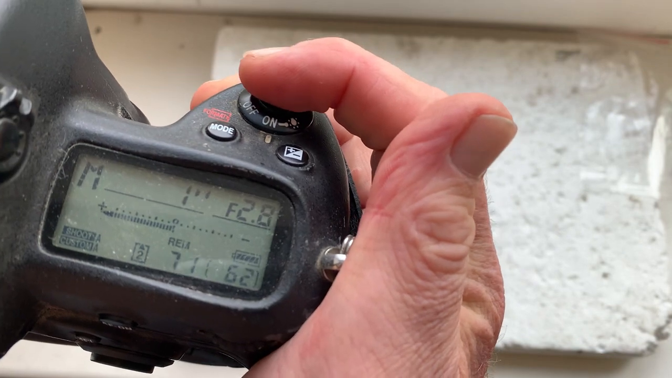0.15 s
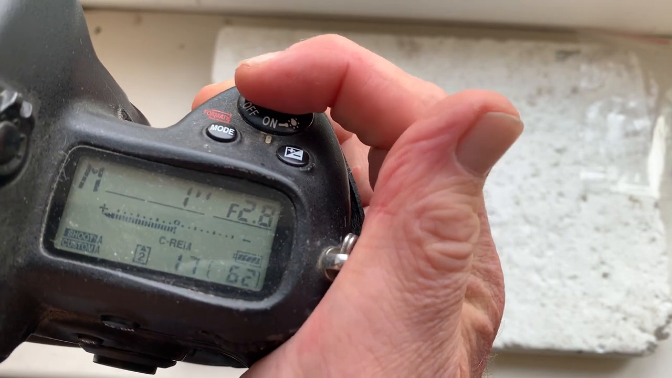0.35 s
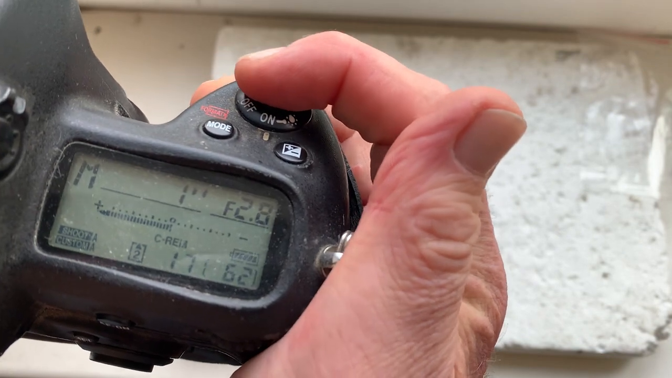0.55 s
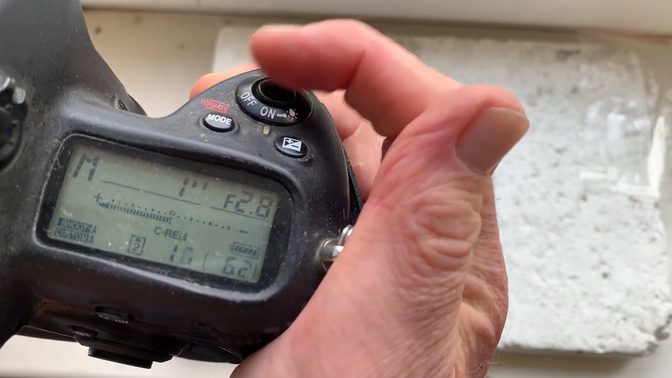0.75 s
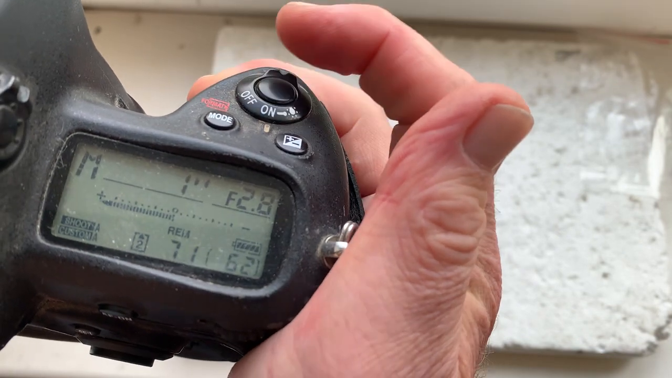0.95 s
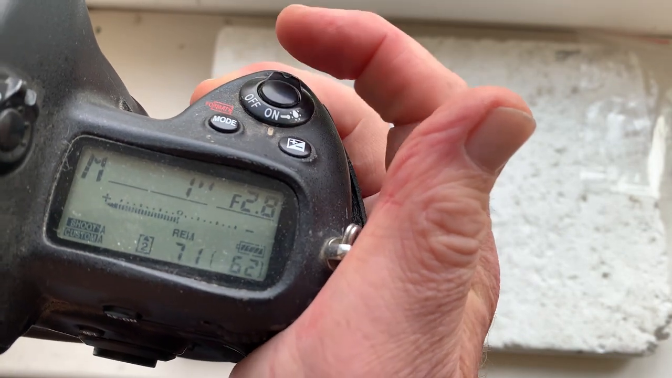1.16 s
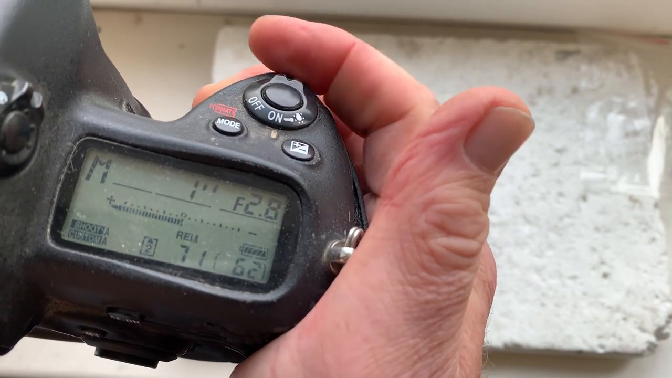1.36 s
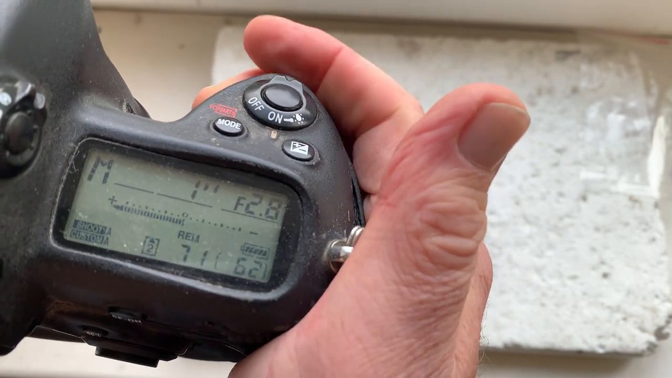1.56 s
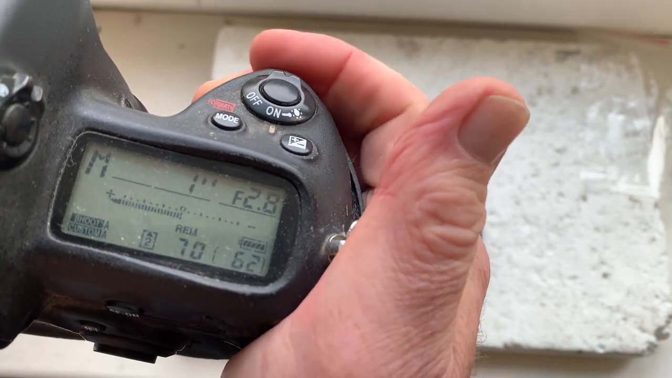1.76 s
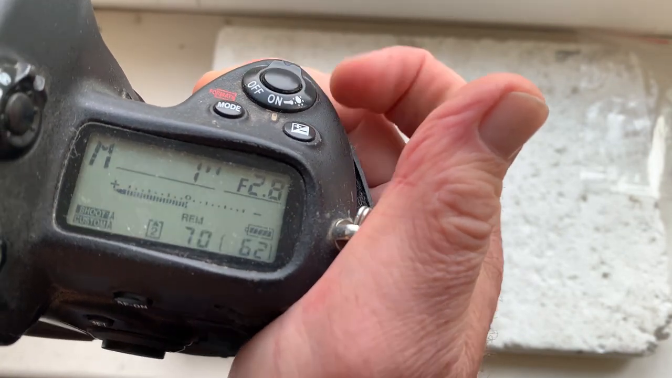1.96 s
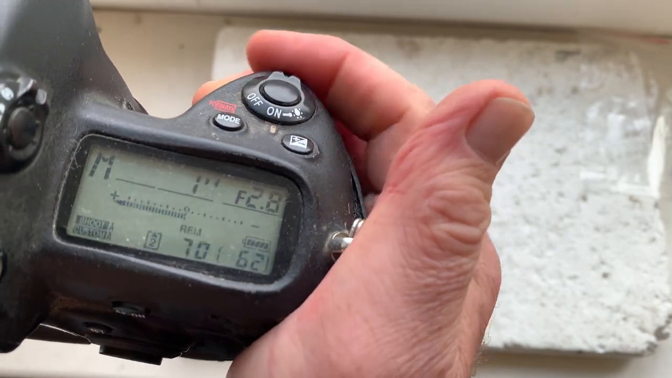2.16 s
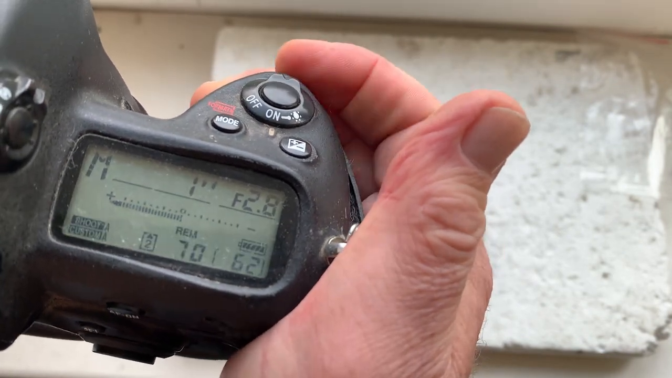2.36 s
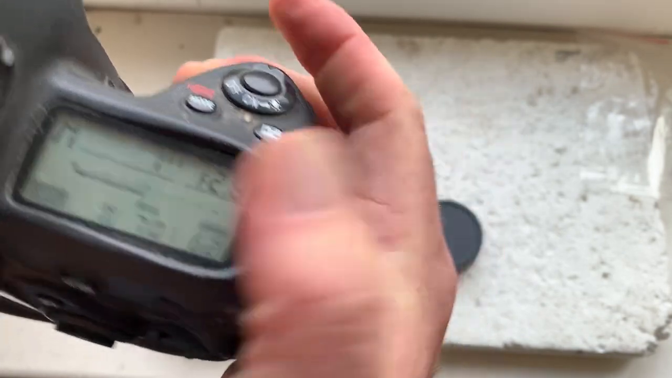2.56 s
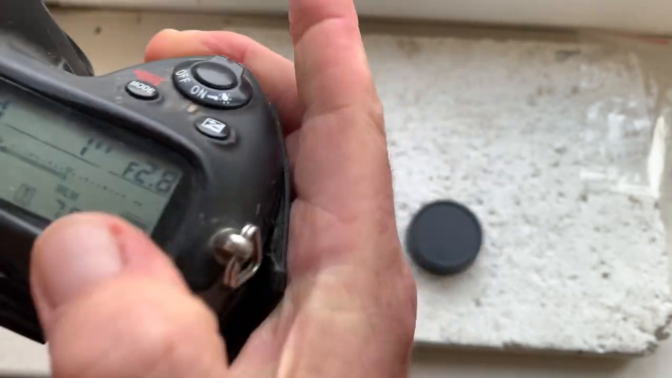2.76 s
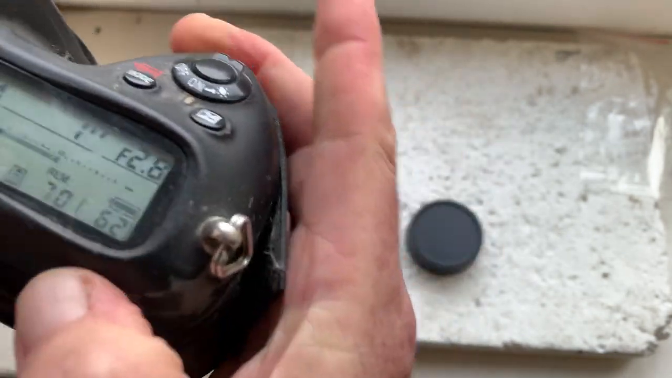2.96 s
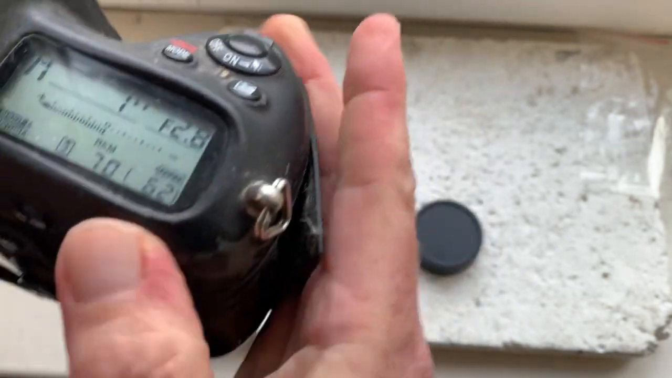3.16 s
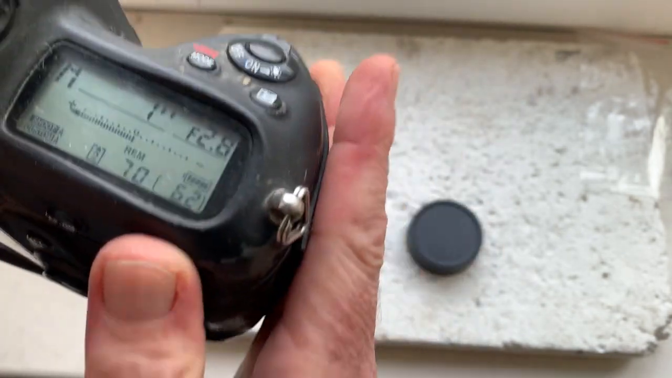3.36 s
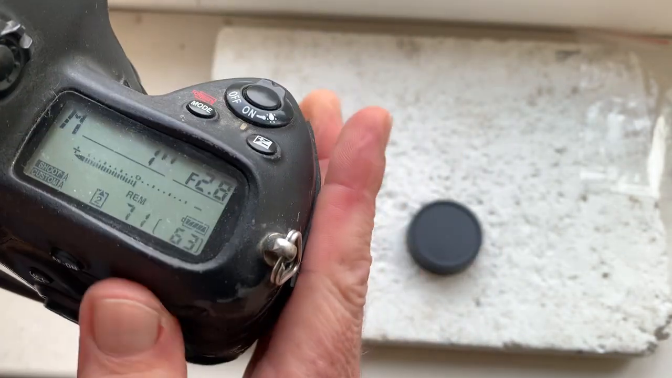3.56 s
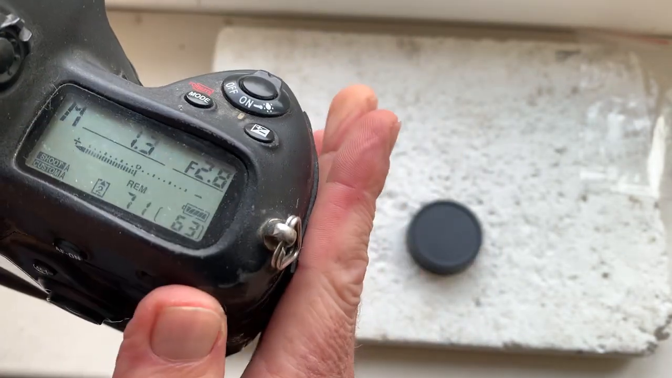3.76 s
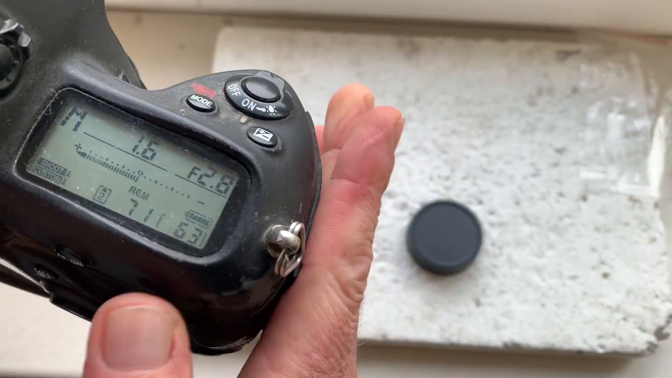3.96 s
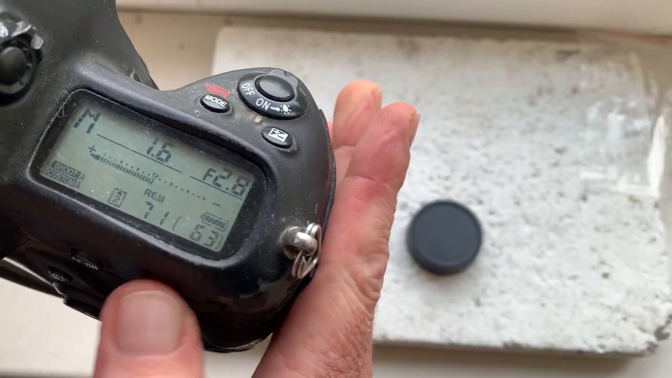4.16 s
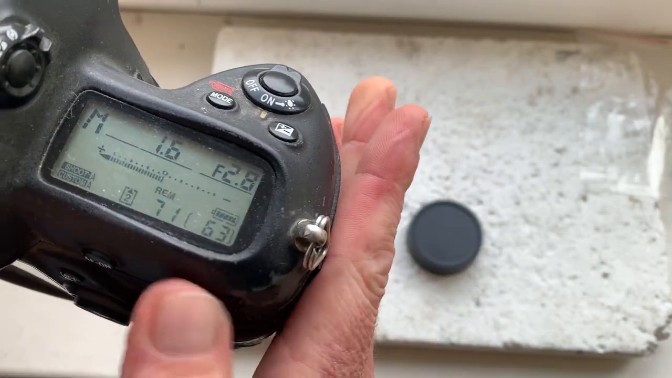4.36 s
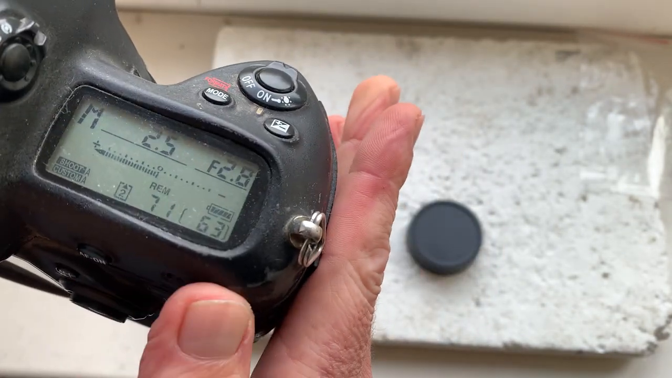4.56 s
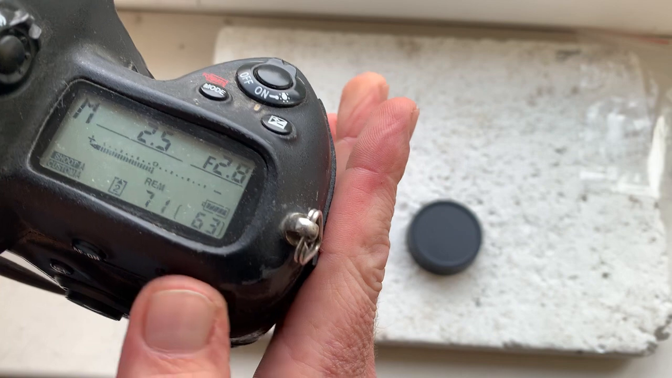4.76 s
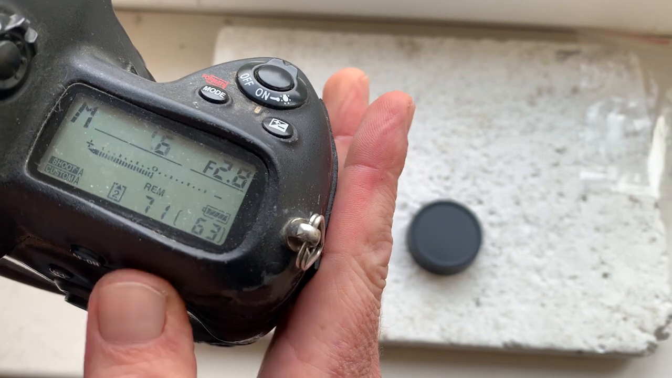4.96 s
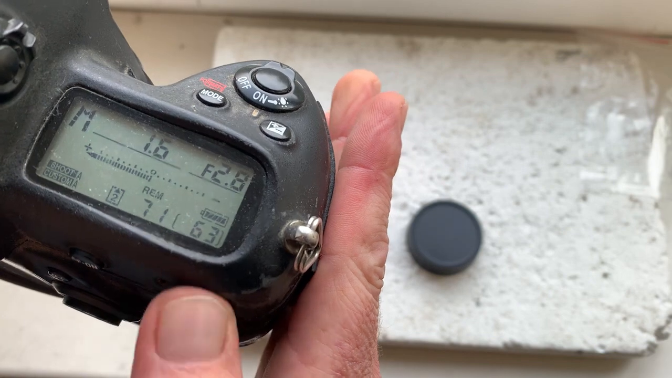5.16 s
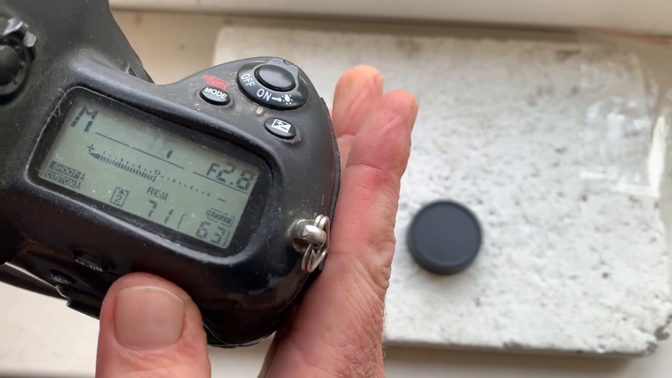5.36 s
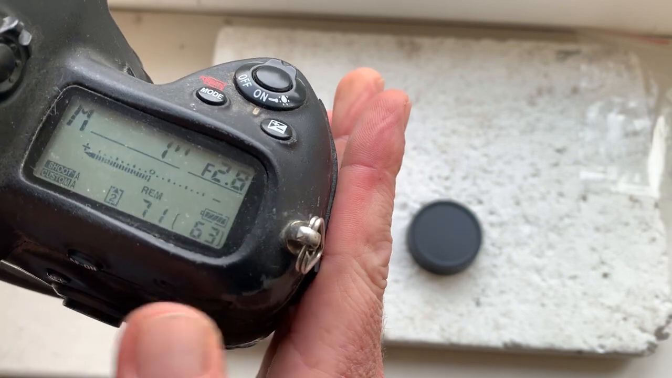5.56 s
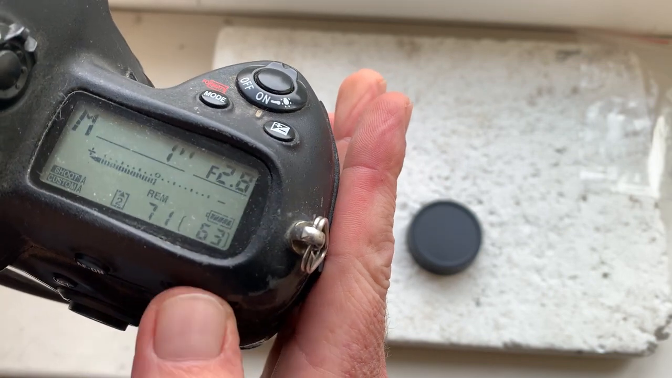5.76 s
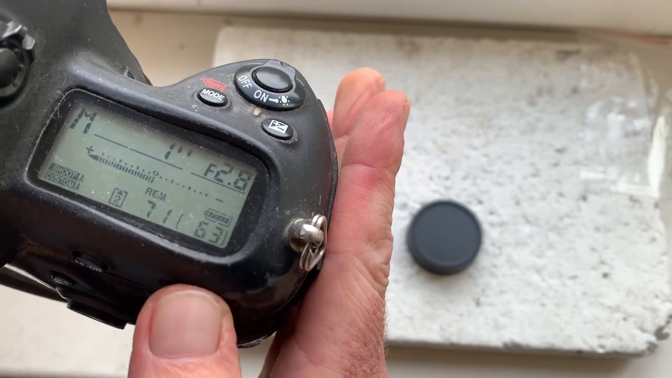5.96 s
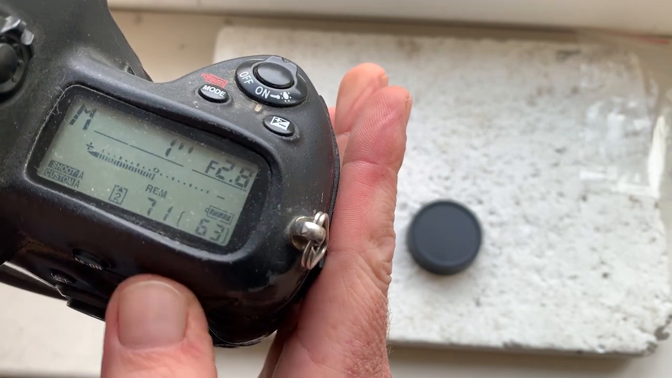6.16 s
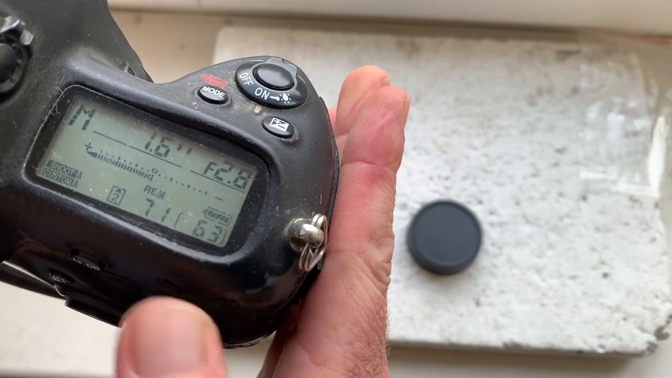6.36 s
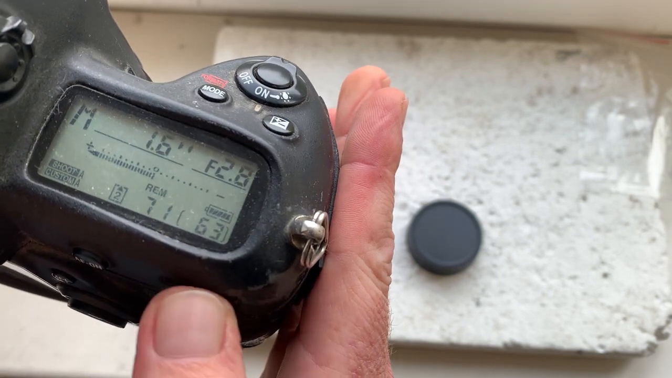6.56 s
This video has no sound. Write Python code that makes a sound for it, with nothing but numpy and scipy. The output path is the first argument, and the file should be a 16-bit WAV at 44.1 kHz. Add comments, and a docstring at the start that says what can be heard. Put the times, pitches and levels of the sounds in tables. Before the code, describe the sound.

A camera shutter snaps open sharply, closes with a clattering clack a second later, then handling ticks, a skin rub and faint dial clicks follow.

```python
"""A low hum and faint hiss fill a small quiet room. A reflex camera close by is touched, then takes a one-second
exposure: the mirror slaps up and bounces and the first curtain runs open; later the second curtain drops and the
mechanism recocks in a short clatter. The finger leaves the release, the hand shifts its grip and slides, and the
thumb turns a dial. Contacts are bursts of tiny impacts coloured by their part, slides are grainy noise, and the
hum is made of wavering sines. Loud bass makes a compressor turn the bass down for a moment."""
import sys
import numpy as np
from scipy import signal
from scipy.fft import rfft, irfft, next_fast_len
from scipy.io import wavfile
from scipy.ndimage import uniform_filter1d, minimum_filter1d, map_coordinates

SR = 44100
rng = np.random.default_rng(int(sys.argv[2]) if len(sys.argv) > 2 else 0)


def generate_wav(signal):
    """Clip the signal to [-1, 1] and save it as 16-bit WAV at the path in sys.argv[1]."""
    frames = np.transpose(np.atleast_2d(signal))
    scaled = np.clip(frames, -1, 1) * 32767
    pcm = np.round(scaled).astype(np.int16)
    wavfile.write(sys.argv[1], SR, pcm)


N = 290971  # length in samples
TOP_HZ = 16200  # nothing much is kept above this
# how alike left and right are in the background and the room tail: f/Hz, likeness (1 = the same)
DISTANT_ALIKE = [(130, .87), (300, .94), (640, .05), (5000, 0.017), (8500, 1), (15000, .4)]
# colour of the first curtain's blades, used in the table of part colours: f/Hz, relative level/dB
BLADES = [(150, -48), (900, -20), (1450, -3), (1800, -15), (2300, -17), (3400, -8), (5000, -3), (6800, -8),
          (8600, 0), (10700, 0), (11700, -6), (12900, -5), (14200, -15), (15600, -14)]


def amp(db):
    """Turn decibels into a plain factor."""
    return 10 ** (np.asarray(db) / 20)


def unit(x):
    """Scale to an average (RMS) strength of 1."""
    return x / np.sqrt(np.mean(x ** 2) + 1e-20)


def along(points, hz):
    """Read a curve of (f/Hz, value) points on a log frequency axis."""
    f, v = np.transpose(points)
    return np.interp(np.log(hz + 1), np.log(f + 1), v)


def waver(rate):
    """A random curve that takes a new value rate times a second, with smooth paths between."""
    return map_coordinates(rng.standard_normal(4096), [np.arange(N) / SR * rate], mode="wrap")


def add(track, s, sound):
    """Mix a sound in at time s."""
    start = round(s * SR)
    track[:, start:start + sound.shape[1]] += sound[:, :N - start]


def band_limit(hz, order=90):
    """Gain of a steep low-pass."""
    return 1 / np.sqrt(1 + (hz / TOP_HZ) ** (2 * order))


def filtered(x, response):
    """Multiply the spectrum of x by a response that depends on frequency."""
    size = next_fast_len(x.shape[-1] + SR // 8)
    spectrum = rfft(x, size) * response(np.fft.rfftfreq(size, 1 / SR))
    return irfft(spectrum, size)[..., :x.shape[-1]]


def coloured(x, spectrum, tilt_db=0, size=8192):
    """Colour x without sounding early; unit power gain, tilted by tilt_db per octave above 1 kHz."""
    hz = np.fft.rfftfreq(size, 1 / SR)
    octaves = np.log2(np.maximum(hz / 1000, 1))
    gain = unit(amp(along(spectrum, hz) + tilt_db * octaves) * band_limit(hz))
    # folding the cepstrum forward gives a filter that starts at once (minimum phase)
    cepstrum = irfft(np.log(gain + 1e-4))
    cepstrum[1:size // 2] *= 2
    cepstrum[size // 2 + 1:] = 0
    impulse = irfft(np.exp(rfft(cepstrum)))[None, :size // 2]
    return signal.fftconvolve(x, impulse, axes=1)[:, :x.shape[1]]


def spread(pair, alike):
    """Turn two unrelated signals, used as mid and side, into left and right with the given likeness."""
    def shares(hz):
        turn = np.arccos(np.clip(along(alike, hz), -1, 1)) / 2
        return np.array([np.cos(turn), np.sin(turn)])

    mid, side = filtered(pair, shares)
    return np.array([mid + side, mid - side])


def contact(t, t60, rise):
    """One blow: a dense rattle of tiny impacts that dies quickly."""
    impacts = rng.choice([-1, 1], (2, len(t)))
    return impacts * amp(-60 * t / t60) * (1 - np.exp(-t / rise))


def friction(size, grain_db):
    """Skin catches and slips: noise broken into millisecond grains of uneven strength."""
    grains = amp(grain_db * unit(uniform_filter1d(rng.standard_normal(size), size=80)))
    return unit(grains * rng.standard_normal((2, size)))


def background():
    """The building's low, slightly wavering hum and rumble, and a faint even hiss of air."""
    # steady tones: f/Hz, level/dB against the rumble setting
    hum_tones = [(43.1, -10), (75.2, -4)]
    # colour of the rumble: f/Hz, relative level/dB
    rumble_colour = [(20, -16.5), (32, -8), (45, -2.5), (58, -7.5), (78, -2), (95, -3.5), (120, -6.5),
                     (165, -10.5), (220, -22), (400, -35), (900, -85)]
    # colour of the air hiss: f/Hz, relative level/dB
    air_colour = [(150, -18), (280, -10.5), (390, 3), (600, -9), (1000, -12.5), (2000, -14.5), (4000, -19),
                  (8000, -22), (11300, -17), (13200, -24.5), (15000, -34)]
    rumble_db, drift_db, drift_per_s = -61.5, -0.5, 3.2  # base level, size and pace of its drift

    def noise(spectrum):
        raw = rng.standard_normal((2, N))
        return unit(spread(filtered(raw, lambda hz: amp(along(spectrum, hz))), DISTANT_ALIKE))

    t = np.arange(N) / SR
    hum = 0
    for hz, db in hum_tones:
        phase = 2 * np.pi * hz * t + 0.91 * waver(5)
        hum = hum + amp(db) * np.sqrt(2) * np.sin(phase)
    level = amp(rumble_db + drift_db * waver(drift_per_s))
    return level * (hum + amp(-4.5) * noise(rumble_colour)) + amp(-77.5) * noise(air_colour)


def ticks(rows, spectrum, gain_db, neutral_db, softening, t60, settle_db, ring_db, ring_t60):
    """Small clicks with a brief ring and a faint settling rattle; more midrange means a duller click."""
    out, t = np.zeros((2, N)), np.arange(SR // 6) / SR
    for s, db, midrange_db, hz in rows:
        tick = contact(t, t60, rise=0.00049) + amp(settle_db) * contact(t, 0.058, rise=.001)
        tick = coloured(tick, spectrum, tilt_db=softening * (neutral_db - midrange_db))
        ring = amp(ring_db) * np.sin(2 * np.pi * (hz * t + rng.random((2, 1))))
        add(out, s, amp(db + gain_db) * (tick + amp(-60 * t / ring_t60) * ring))
    return out


def grip_ticks():
    """Fingers tap the release button and the grip: quick coloured blows with a short ring."""
    # touches: t/s, relative level/dB, midrange against treble/dB, ring f/Hz
    touches = [(.2364, -57.5, -15, 2880), (.7761, -36, -15.5, 10100), (1.8168, -37.5, -46, 10330),
               (1.8325, -48.5, -8, 10600), (1.875, -42.5, -5.5, 10500), (1.8831, -41.5, -11.5, 9540),
               (2.4319, -30, -15, 8030), (2.4822, -32, -10.5, 3420), (2.4869, -32, -8.5, 7060),
               (2.5369, -29.5, -12, 7350), (2.5612, -28, -14.5, 11100), (2.5701, -27.5, -12.5, 10600),
               (2.612, -43.5, -3.5, 5140), (2.679, -53.5, -8, 4400), (2.7053, -45, -14, 6320),
               (3.1707, -26.5, -18.5, 11000), (6.5525, -50, -8.5, 4580)]
    # colour of a touch: f/Hz, relative level/dB
    colour = [(200, -41), (900, -26.5), (2000, -14), (3800, -7), (6000, -7.5), (8500, 1.5), (11000, -5.5),
              (13000, -11.5), (15000, -38)]
    return ticks(touches, colour, gain_db=-3, neutral_db=-16.5, softening=0.67, t60=0.0082,
                 settle_db=-15.0, ring_db=-7.5, ring_t60=0.015)


def dial_clicks():
    """The dial clicks sharply: blows that last longer than a touch and ring more strongly."""
    # clicks: t/s, relative level/dB, midrange against treble/dB, ring f/Hz
    clicks = [(.3324, -65, -4, 2895), (2.1145, -58.5, -11, 4120), (2.2884, -53, 10, 3800),
              (3.4024, -47, -4, 1911), (3.612, -55, -10.5, 2010), (3.6559, -45.5, 10, 2030),
              (3.6814, -47, -13, 2200), (3.9205, -45, -9, 2430), (4.6728, -49.5, -13.5, 2940),
              (4.8698, -44, -13, 1960), (5.4748, -47.5, -6.5, 2740)]
    # colour of a click: f/Hz, relative level/dB
    colour = [(250, -34.5), (1000, -11.5), (1800, 3), (2800, 3), (4000, -5), (5300, -13.5), (7200, 1.5),
              (9000, 0.5), (11000, 3), (13000, -20), (15000, -34)]
    return ticks(clicks, colour, gain_db=-5, neutral_db=-14.0, softening=0.52, t60=0.0162,
                 settle_db=-9.5, ring_db=-3, ring_t60=.022)


def mechanism(bounce_count, tooth_count):
    """List every contact inside the camera: blows, their rattles, curtain runs, mirror rebounds, gear teeth."""
    # main blows: t/s, relative level/dB, time to fall by 60 dB/s, part
    blows = [(0.4345, -12, 0.0083, "mirror"), (.4364, -8.5, 0.0098, "mirror"),
             (0.4752, -15, 0.021, "blades"), (1.4746, -12.5, 0.019, "drop"),
             (1.4933, -16.5, 0.022, "recock"), (1.4965, -20, 0.02, "recock"),
             (1.501, -18.5, 0.031, "recock"), (1.5109, -22, 0.014, "recock"), (1.5175, -15, .011, "recock")]
    # loose parts rattle after every blow: delay, level against it, decay
    rattle_s, rattle_db, rattle_t60_s = .0035, -16, .045
    # a curtain runs before its stop: time ahead, level against the stop, decay
    run_s, run_db, run_t60_s = .0048, -13, .045
    bounce_s, bounce_shrink = .012, .68  # the mirror's first flight, each next flight over the last
    bounce_db, bounce_loss_db, bounce_t60_s = -22.5, 6.5, 0.02405  # first rebound, loss per rebound, decay
    # recocking gear: start, time from tooth to tooth, relative level, decay
    gear_start_s, gear_step_s, gear_db, gear_t60_s = 1.482, .0066, -28.5, .04

    rattles = [(s + rattle_s, db + rattle_db, rattle_t60_s, part) for s, db, _, part in blows]
    runs = [(s - run_s, db + run_db, run_t60_s, part)
            for s, db, _, part in blows if part in ("blades", "drop")]
    mirror_up = max(s for s, _, _, part in blows if part == "mirror")
    landings = mirror_up + np.cumsum(bounce_s * bounce_shrink ** np.arange(bounce_count))
    rebounds = [(s, bounce_db - bounce_loss_db * k, bounce_t60_s, "mirror")
                for k, s in enumerate(landings)]
    teeth = [(gear_start_s + gear_step_s * k, gear_db, gear_t60_s, "recock") for k in range(tooth_count)]
    return blows + rattles + runs + rebounds + teeth


def shutter(shove_db, shove_s):
    """Each contact cracks in the colour of its part and shoves the body, which rings."""
    # colour of each part's blow, by part name: f/Hz, relative level/dB
    part_colours = {"mirror": [(100, -51), (330, -33), (520, -20), (1000, -9), (1370, -10), (1800, -20.5),
                    (2250, -6), (2700, -8), (3500, -1.5), (5400, -15), (8800, -6.5), (9800, -11.5),
                    (10700, 3.5), (12300, -9), (15500, -17)], "blades": BLADES, "drop": [(80, -44),
                    (290, -23), (385, -7.5), (560, -17), (800, -11), (1400, 0.5), (2400, -16), (3600, 1.5),
                    (5700, -6.5), (7300, -1), (9000, 0.5), (11500, -12), (12700, -1.5), (14400, -27),
                    (15600, -20)], "recock": [(120, -71), (380, -17), (520, -25), (900, -6.5), (1500, -6.5),
                    (2200, -13), (3700, -6.5), (6500, -8), (8500, 1), (11400, -4), (12600, -1),
                    (14200, -16), (15600, -14.5)]}
    # resonances of the body and its springs: f/Hz, peak gain/dB, time to fall by 60 dB/s
    body_modes = [(374, 5, .1), (651.5, 1, 0.13), (849, 4.5, 0.11), (1430, -1.5, .025), (1827, 1.5, 0.025),
                  (3320, 1.5, 0.033), (3800, -3, .056), (4560, -2, .07), (6281, 0, 0.11),
                  (7060, -2.5, 0.12), (9560, 0, 0.053), (10700, -4, 0.035), (12300, -3.5, .05)]
    cracks, t = np.zeros((2, N)), np.arange(SR // 5) / SR
    shove = (1 - t / shove_s) * np.exp(-t / shove_s)  # one low push, common to both sides
    for s, db, t60, part in mechanism(bounce_count=4, tooth_count=7):
        crack = coloured(contact(t, t60, rise=.00033), part_colours[part])
        crack[0] += amp(shove_db) * shove
        add(cracks, s, amp(db + 1.5) * crack)
    ring = np.zeros(len(t))
    for hz, db, t60 in body_modes:
        fade = amp(-60 * t / t60)
        ring += amp(db) * 2 * fade / fade.sum() * np.cos(2 * np.pi * hz * t)
    return cracks + signal.fftconvolve(cracks, ring[None], axes=1)[:, :N]


def thumb(grain_db):
    """A dial or switch scrapes twice at each notch: climbing out of one detent, dropping into the next."""
    # notches: t/s of the climb, climb level/dB, drop level/dB, tilt/dB per octave
    drags = [(1.852, -77, -57.5, 10), (2.267, -73, -74.5, 1.5), (3.656, -56, -57.5, .5),
             (4.383, -64, -83, 0), (4.443, -71, -94, -1), (4.84, -62.5, -58.5, -1), (5.263, -62.5, -63, -2),
             (6.105, -67, -82, -0.5)]
    # colour of the scrape: f/Hz, relative level/dB
    drag_colour = [(250, -23), (800, -14), (1500, -4), (2200, 0), (3200, -13), (3900, -2), (4700, -14.5),
                   (6000, -14.5), (7200, -12), (10000, -9), (13000, -17.5), (15000, -26)]
    notch_s, drag_half_s = 0.029, 0.0092  # climb to drop, bell-curve width of each
    out, t = np.zeros((2, N)), np.arange(-SR // 10, SR // 10) / SR

    def swell(delay):
        return np.exp(-((t - delay) / drag_half_s) ** 2 / 2)

    for s, climb_db, drop_db, tilt_db in drags:
        strength = amp(climb_db) * swell(0) + amp(drop_db) * swell(notch_s)
        stroke = strength * friction(len(t), grain_db)
        add(out, s + t[0], coloured(stroke, drag_colour, tilt_db))
    return out


def palm(grain_db):
    """The palm hisses along the textured grip in swelling, fading slides; skin squeaks near the strongest."""
    # slides: t/s of the strongest rub, level/dB, swell/dB per s, fade/dB per s
    slides = [(2.44, -64.5, 600, 63), (2.88, -87.5, 59, 60), (3.214, -53.5, 121, 440)]
    # colour of rubbing skin: f/Hz, relative level/dB
    skin_colour = [(500, -31), (1500, -11), (2000, -3.5), (2600, -11.5), (3700, -1.5), (6000, -6),
                   (8500, -1), (10500, -3), (13000, -7.5), (14500, -28)]
    # squeaks: t/s of the middle, bell-curve width/s, f/Hz, waver of f/Hz, level/dB
    squeaks = [(3.103, 0.063, 1997, 110, -75), (3.198, 0.015, 3750, 450, -54.5)]
    t = np.arange(N) / SR
    rub = sum(amp(db - np.maximum(swell * (s - t), fade * (t - s))) for s, db, swell, fade in slides)
    out = rub * coloured(friction(N, grain_db), skin_colour)
    for s, half, hz, waver_hz, db in squeaks:
        pitch = hz + waver_hz * waver(500)
        envelope = amp(db) * np.exp(-((t - s) / half) ** 2 / 2)
        out = out + envelope * np.sin(2 * np.pi * np.cumsum(pitch) / SR)
    return out


def room(x, build):
    """The walls answer with a short diffuse tail whose decay time depends on frequency."""
    # decay of the tail: f/Hz, time to fall by 60 dB/s
    decay = [(200, .083), (1400, 0.22), (5000, .19), (10000, .15), (15000, .14)]
    hz, t, z = signal.stft(rng.standard_normal((2, SR // 2)), SR, nperseg=256)
    envelope = amp(-60 * t / along(decay, hz)[:, None]) * (1 - np.exp(-t / build))
    tail = signal.istft(z * envelope, SR, nperseg=256)[1]
    tail = tail / np.linalg.norm(tail[0])
    return spread(signal.fftconvolve(x, tail, axes=1)[:, :N], DISTANT_ALIKE)


def bass_compressor(x):
    """Loud bass slowly pushes the bass down; the cut holds, then lets go at a steady rate."""
    # upper edge of the bass, level where cutting starts, dB cut per dB above it, deepest cut
    edge_hz, threshold_db, slope, depth_db = 720, -58.5, 1.8, 11
    lag_s, attack_s, hold_s, release_db_per_s = 0.017, 0.14, 0.17, 56
    bass = filtered(x, lambda hz: 1 / (1 + (hz / edge_hz) ** 4))
    attack, hold = int(attack_s * SR), int(hold_s * SR)

    def recent(v):  # average over the attack time just past
        return uniform_filter1d(v, attack, origin=(attack - 1) // 2)

    level_db = 10 * np.log10(np.abs(recent(np.mean(bass ** 2, axis=0))) + 1e-12)
    gain_db = np.clip(slope * (threshold_db - level_db), -depth_db, 0)
    gain_db = minimum_filter1d(gain_db, hold, origin=(hold - 1) // 2)
    recovery_db = release_db_per_s * np.arange(N) / SR
    gain_db = np.minimum.accumulate(gain_db - recovery_db) + recovery_db  # rises no faster than the release
    late_db = np.interp(np.arange(N) - lag_s * SR, np.arange(N), recent(gain_db))
    return x + (amp(late_db) - 1) * bass


def scene():
    """The camera and the hands close by, their room and the background."""
    # how alike left and right are for the close sounds: f/Hz, likeness (1 = the same)
    near_alike = [(450, .98), (800, .75), (1400, .55), (3000, .45), (5500, .55), (8000, .95), (15000, .95)]
    hands = grip_ticks() + dial_clicks() + thumb(grain_db=3.5) + palm(grain_db=2.5)
    camera = shutter(shove_db=-18.0, shove_s=0.0002) + hands
    return spread(camera, near_alike) + amp(-15.5) * room(camera, build=0.002) + background()


def record(dry):
    """The bass is compressed; the two microphone ports are out of step; the band limit cuts the top."""
    # how far the left port leads the right: f/Hz, lead/radians
    ports = [(0, 0), (520, 0), (750, 1.3), (1150, 3), (1500, 4), (2000, 5), (2500, 4.4), (3000, 6),
             (4700, 15.5), (6800, 11.6), (8500, 9.5), (11000, 6.2), (13500, 3.1), (16000, -.3)]

    def response(hz):
        lead = uniform_filter1d(np.interp(hz, *np.transpose(ports)), size=len(hz) // 70)
        return np.exp(.5j * np.outer([1, -1], lead)) * band_limit(hz)  # half the lead to each side

    return filtered(bass_compressor(dry), response)


dry = scene()
out = record(dry)
generate_wav(out)
```